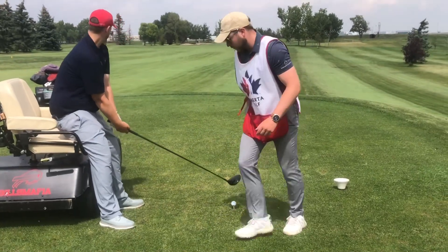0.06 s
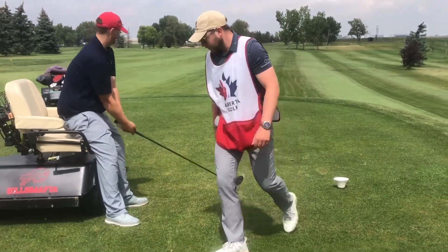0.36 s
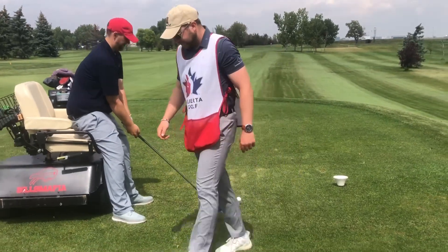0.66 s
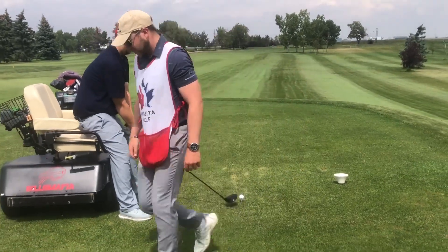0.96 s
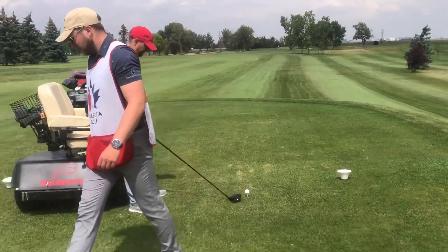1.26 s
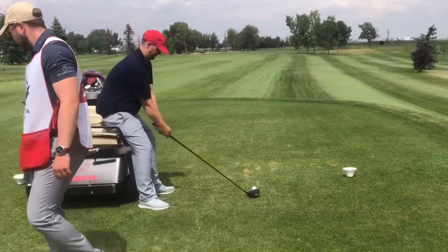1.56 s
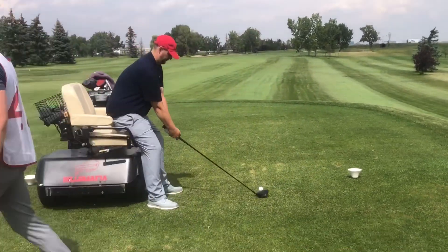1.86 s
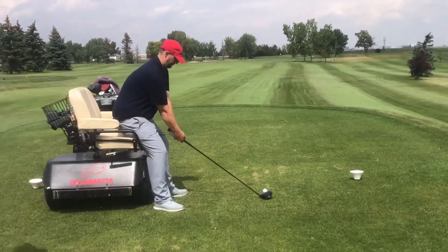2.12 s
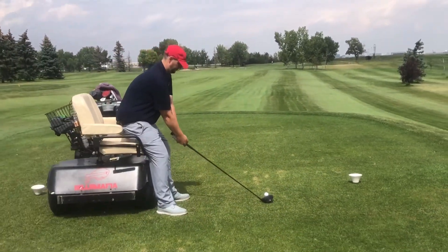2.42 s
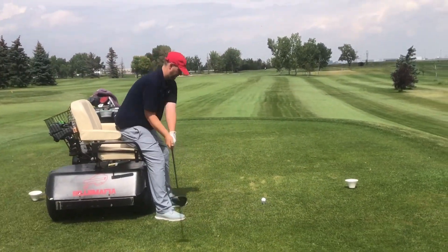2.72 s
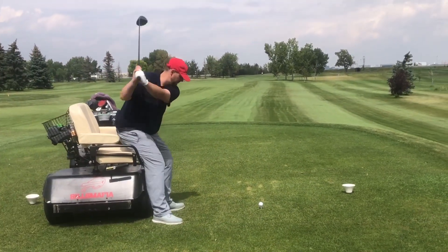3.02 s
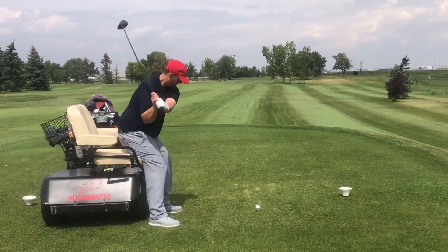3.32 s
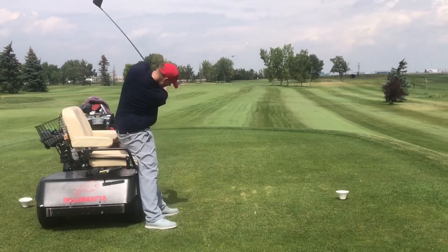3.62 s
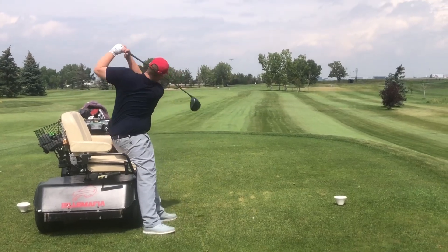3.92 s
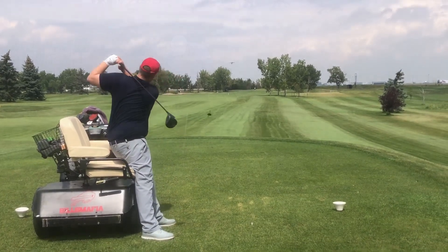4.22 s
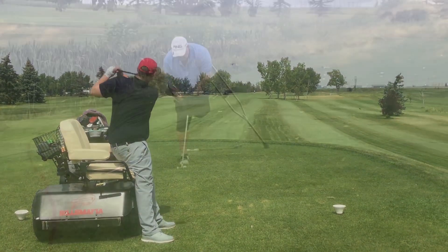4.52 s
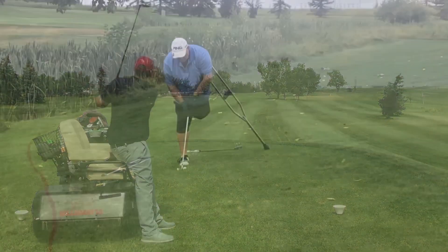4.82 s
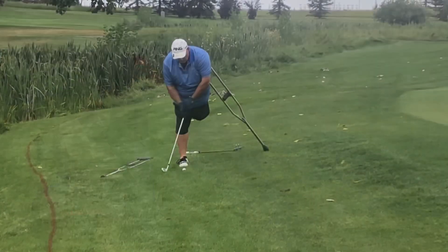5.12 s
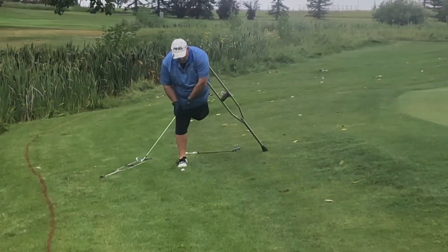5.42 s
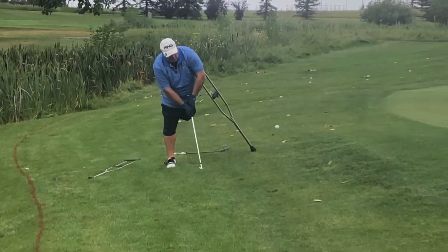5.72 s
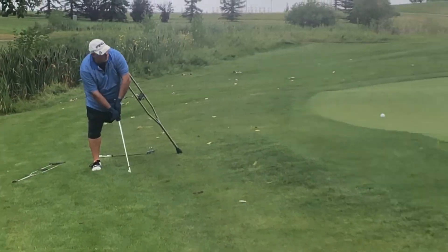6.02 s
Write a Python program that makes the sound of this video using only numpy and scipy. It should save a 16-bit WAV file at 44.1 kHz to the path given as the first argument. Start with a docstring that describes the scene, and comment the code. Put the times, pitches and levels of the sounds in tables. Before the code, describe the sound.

Quiet open air on a golf course, with light wind on the microphone and a faint, distant engine drone that slowly eases off. A soft low bump comes at 0.2 seconds, and a small bird gives a faint, high stutter and falling whistle just after. Between about 1.3 and 1.9 seconds, several dull thumps sound close to the microphone with low gusts and tiny clothing ticks. The bird repeats near 2.6 seconds. At 3.5 seconds a golf club swishes briefly and strikes the ball with a loud, sharp crack and a short metallic ring, the loudest event. The bird calls again around 3.7 and 4.1 seconds. From about 4.2 seconds a faint, steady buzz like a small electric motor sounds for a second, fading with the engine into quieter, breezy air. At about 5.6 seconds an iron clicks faintly against a ball.

```python
"""At a golf tee a far engine drones, a small bird repeats a stutter and a falling whistle, and soft
bumps come as a helper walks past. At 3.5 s a golfer drives from a seated cart: turbulent air swishes,
then the impact cracks and sets the modes of the hollow metal club head ringing. A steady buzz starts
and fades with the tee into a quieter, breezy green, where a faint whistle sounds and an iron clicks."""
import sys
import numpy as np
from scipy import signal
from scipy.fft import rfft, irfft, next_fast_len
from scipy.io import wavfile

SR = 44100
rng = np.random.default_rng(int(sys.argv[2]) if len(sys.argv) > 2 else 0)


def transcribe(signal):
    """Save signal, clipped to [-1, 1], as a 16-bit WAV file at the path in sys.argv[1]."""
    frames = np.atleast_2d(signal).T
    limited = np.clip(frames, -1, 1)
    pcm = np.round(limited * 32767).astype(np.int16)
    wavfile.write(sys.argv[1], SR, pcm)


N = 272097
T = np.arange(N) / SR


# hollow notes and low thud of the blow: (frequency [Hz], level [dB], t60 [s])
KNOCK_MODES = [(965, -28, .035), (540, -26, .04), (105, -45, 0.23)]
# heavily damped modes of the club face: (frequency [Hz], level [dB], t60 [s])
FACE_MODES = [(3253, -20.5, 0.015), (3990, -17.5, .014), (5200, -20.5, 0.0091), (7740, -14, 0.0085),
              (11100, -20.5, .012), (12890, -24, 0.027)]
# modes of the hollow head: (frequency [Hz], relative level [dB], t60 [s])
HEAD_MODES = [(3160, -21.5, .1), (3450, -27, .07), (3800, -22, .08), (4420, -28, .08), (5075, -17, .07),
              (5520, -18, 0.08), (5900, -21, 0.08), (6105, -16, .065), (6260, -12.5, .065),
              (6920, -7, 0.08), (7060, -16, .06), (7240, -4, 0.055), (7680, -0.5, .052), (8000, 1, 0.052),
              (8200, -3, .065), (8575, -8, .055), (8962, -9, .058), (9470, -6.5, .06), (9596, -8.5, .06),
              (9900, -13, 0.06), (10900, -17, .06), (11200, -9, .042), (11800, -12, 0.053),
              (11800, -11, .042), (13520, -13, .04), (13970, -14, .036), (14395, -15, .036)]
# burst of the impact: (frequency [Hz], relative density [dB])
CRACK_SPECTRUM = [(200, -28.5), (600, -15.5), (1600, -5), (2400, -9.5), (4500, -1.5), (7800, -3),
                  (11000, -2.5), (16000, -7.5)]
# wash of the head's many weak modes: (frequency [Hz], relative density [dB])
SHIMMER_SPECTRUM = [(300, -13.5), (1200, -5), (2400, -13.5), (3800, -7), (4700, -9), (6200, -4.5),
                    (7900, 0), (9800, -4), (10400, -9), (12500, -8), (16000, -12)]

def drive(impact_s=3.5177, high_hz=2100, low_hz=380, fall_s=.0011, release_s=.0006):
    """Impact excitation: the ball knocks, the face cracks, and the head rings once the ball has left."""
    t = T[:SR // 4]
    hz = low_hz + (high_hz - low_hz) * np.exp(-t / fall_s)
    knock = amp(-7.5 - 60 * t / .013) * np.sin(2 * np.pi * np.cumsum(hz) / SR) - ringing(KNOCK_MODES, t)
    crack = amp(-12.5 - 60 * t / .014) * noise(CRACK_SPECTRUM, len(t))
    shimmer = amp(-22 - 60 * t / .052) * noise(SHIMMER_SPECTRUM, len(t))
    contact = 1 - np.exp(-t / .00015)  # the ball flattens on the face
    out = np.zeros(N)
    add(out, impact_s, contact * (knock + crack + shimmer))
    add(out, impact_s + release_s, ringing(FACE_MODES, t) + amp(-23) * ringing(HEAD_MODES, t))
    return out


# reflections from cart and ground, then from far trees: (delay [s], spread [s], relative level [dB])
NEAR_ECHOES = [(.008, .006, -24), (.018, .009, -30), (.036, 0.0076, -30)]
FAR_ECHOES = [(.1, 0.021, -42), (.16, 0.063, -47.5)]
# frequency response of those two paths: (frequency [Hz], gain [dB])
NEAR_RESPONSE = [(200, -2.5), (1000, -4), (3200, 2.5), (6000, -2), (8000, -3.5), (11000, -3.5), (16000, -4)]
FAR_RESPONSE = [(200, 1), (1000, -16), (3000, 6.5), (5000, 1.5), (8000, -8.5), (11000, -8), (16000, -18)]

def with_reflections(shot):
    """Multipath propagation: near and far reflections follow the direct sound."""
    return shot + echoes(shot, NEAR_ECHOES, NEAR_RESPONSE) + echoes(shot, FAR_ECHOES, FAR_RESPONSE)


# airflow around shaft and head: (frequency [Hz], relative density [dB])
SWISH_SPECTRUM = [(150, -13), (350, -3), (560, 5.5), (900, -6.5), (2000, -17), (3500, -20), (8000, -26),
                  (15000, -33)]

def swish(peak_s=3.505, peak_db=-52.5, rise_db_per_s=196, fall_db_per_s=300):
    """Turbulence noise grows as the club speeds up and dies in the follow-through."""
    below_peak_db = np.maximum((peak_s - T) * rise_db_per_s, (T - peak_s) * fall_db_per_s)
    return noise(SWISH_SPECTRUM) * amp(peak_db - below_peak_db)


def chip(impact_s=5.626):
    """A light impact: an iron clicks on a ball, rings in one damped mode and brushes the grass."""
    click = tick(db=-56, hz=11000, t60=.018) + tick(db=-53, hz=4500, t60=.018)
    grass = tick(db=-67, hz=6500, t60=.14)
    ring = ringing([(3550, -63.5, .04)], T[:SR // 8])
    out = np.zeros(N)
    add(out, impact_s, click + grass + ring)
    return out


# thumps near the microphone: (time [s], level at the final pitch [dB], starting pitch [Hz], length [s])
BUMPS = [(0.196, -32.5, 106, 0.025), (1.356, -30, 604, 0.034), (1.427, -36, 230, .026),
         (1.448, -34, 522, 0.028), (1.743, -37, 323, 0.02), (1.776, -39, 278, 0.0164),
         (1.851, -30, 300, 0.018)]

def bumps(end_hz=73.5, sag_s=.00488, attack_s=.0015, db_per_octave=-2):
    """Downward chirps of a few cycles: each thump gains weight as it sinks toward the same low note."""
    out = np.zeros(N)
    for s, db, start_hz, length in BUMPS:
        t = np.arange(0, length, 1 / SR)
        hz = end_hz + (start_hz - end_hz) * np.exp(-t / sag_s)
        envelope = (1 - np.exp(-t / attack_s)) * (1 - (t / length) ** 4)
        level = amp(db + db_per_octave * np.log2(hz / end_hz))
        add(out, s, -level * envelope * np.sin(2 * np.pi * np.cumsum(hz) / SR))
    return out


# spectral envelope of the buzz: (harmonic number, relative level [dB])
BUZZ_HARMONICS = [(2, -10), (3, -2.5), (4, 0), (5, 0), (6, -1), (7, -1), (8, -7), (9, -4.5), (10, -5.5),
                  (11, -7.5), (12, -5), (13, -8), (14, -15.5), (15, -17.5), (17, -30), (19, -32), (21, -18),
                  (23, -20), (26, -32), (28, -40)]
# its decay, fastest in the low harmonics: (frequency [Hz], decay rate [dB/s])
BUZZ_DECAY = [(1000, 7.5), (2400, 5.5), (4500, 0.5)]
# its swells, strongest in the treble: (time [s], gain at harmonic 10 [dB], half-width [s])
BUZZ_SWELLS = [(4.29, 2.5, .04), (4.42, 3.5, 0.056), (4.59, 1.5, 0.033), (4.83, 3.5, 0.042)]

def buzz(on_s=4.178, off_s=5.15, pitch_hz=203.7, gain_db=-59, attack_s=.0097, release_s=.03):
    """A harmonic series, as of a small electric motor; each partial wavers in level on its own."""
    t = np.arange(0, off_s - on_s, 1 / SR)
    size = len(t)
    settling = 1 + .012 * np.exp(-t / .032)
    jitter = 1 + .0004 * drift(7.8, size) + .0048 * drift(106, size)
    turns = np.cumsum(pitch_hz * settling * jitter) / SR
    swells_db = sum(db * swell(s, width) for s, db, width in BUZZ_SWELLS)[round(on_s * SR):][:size]
    tone = np.zeros(size)
    for k in range(2, 29):
        phase = 2 * np.pi * (k * turns + .81 * rng.random())
        wander = 1 + .6 * np.tanh(1.5 * drift(13, size))
        sidebands = drift(45, size) * np.sin(phase) + drift(45, size) * np.cos(phase)
        decay_db = read(BUZZ_DECAY, k * pitch_hz) * t
        level = amp(follow(BUZZ_HARMONICS, k) - decay_db + swells_db * np.sqrt(k / 10))
        tone += level * (wander * np.sin(phase) + .06 * np.sqrt(k) * sidebands)
    gate = np.minimum(t / attack_s, 1) * np.minimum((t[-1] - t) / release_s, 1)
    out = np.zeros(N)
    add(out, on_s, amp(gain_db) * tone * gate)
    return out


# songs: (stutter time [s], level [dB], whistle time [s], level [dB], whistle length [s], pitch factor)
SONGS = [(0.301, -65, 0.35, -60, 0.13, 1), (2.613, -61, 2.664, -59, .12, 1),
         (3.635, -77, 3.703, -65, 0.083, 1), (4.101, -61, 4.153, -56.5, .122, 0.996)]
# reflections from grass and trees: (delay [s], spread [s], relative level [dB])
BIRD_ECHOES = [(.005, 0.012, -9)]

def bird():
    """A stutter, then a falling whistle, blurred a little by scattering from grass and trees."""
    out = np.zeros(N)
    for stutter_s, stutter_db, whistle_s, whistle_db, length, factor in SONGS:
        add(out, stutter_s, amp(stutter_db) * stutter(factor))
        add(out, whistle_s, amp(whistle_db) * whistle(length, factor))
    return out + echoes(out, BIRD_ECHOES, NEAR_RESPONSE)


def stutter(factor, length_s=.025, sweep_hz=(5400, 6100), pulse_hz=171, upper_ratio=1.45, upper_db=-12):
    """Fast amplitude and frequency modulation make a two-voiced upsweep rasp."""
    t = np.arange(0, length_s, 1 / SR)
    modulator = np.cos(2 * np.pi * pulse_hz * t)
    hz = factor * np.interp(t, [0, length_s], sweep_hz) * (1 + .07 * modulator)
    pulses = np.sin(np.pi * t / length_s) * (1 - .5 * modulator)
    lower = note(hz, waver=.03, flutter_db=-.5)
    upper = note(hz * upper_ratio, waver=.03, flutter_db=.5)
    return pulses * (lower + amp(upper_db) * upper)


def whistle(length, factor, from_hz=6330, to_hz=5130, bend=1.3, attack_s=.019, fade_db=-16):
    """A frequency glide: a thin note holds its top, bends down, levels out and fades."""
    t = np.arange(0, length, 1 / SR)
    progress = t / length
    fall = np.sin(np.pi / 2 * progress ** bend) ** 2
    hz = factor * (from_hz + (to_hz - from_hz) * fall)
    envelope = np.minimum(t / attack_s, 1) * amp(fade_db * progress ** 2.05)
    return envelope * note(hz, waver=.0065, flutter_db=2)


def note(hz, waver, flutter_db):
    """Random modulation leaves a bird's near-pure tone slightly unsteady in pitch and level."""
    size = len(hz)
    turns = np.cumsum(hz * (1 + waver * drift(150, size))) / SR
    envelope = amp(flutter_db * drift(120, size)) * signal.windows.tukey(size, .12)
    return envelope * np.sin(2 * np.pi * turns)


# speed of the engine: (time [s], cycle rate [Hz])
ENGINE_SPEED = [(0, 27.6), (.5, 30), (1.5, 28.8), (3, 25.3), (5.3, 24.2)]
# its orders: (multiple of the cycle rate, relative level [dB])
ENGINE_ORDERS = [(6, 2.5), (7, -13.5), (8, -0.5), (9, -5.5), (10, -9.5), (13, -13.5)]
# exhaust resonance: (frequency [Hz], gain [dB])
EXHAUST_RESPONSE = [(140, -17.5), (162, -8.5), (174, -1), (205, 1), (232, -4.5), (380, -5)]

def engine(gain_db=-54, fade_db_per_s=1.36):
    """Source and filter: as a far engine eases off, its orders slide through the exhaust resonance."""
    cycle_hz = follow(ENGINE_SPEED, T)
    turns = np.cumsum(cycle_hz) / SR
    drone = np.zeros(N)
    for k, db in ENGINE_ORDERS:
        level = amp(db + read(EXHAUST_RESPONSE, k * cycle_hz) + 1.5 * drift(3.1))
        drone += level * np.sin(2 * np.pi * (k * turns + rng.random()))
    return amp(gain_db - fade_db_per_s * T) * drone


# ticks, squeaks and scuffs: (time [s], relative level [dB], centre [Hz], width [octaves], t60 [s])
TICKS = [(.192, -58.5, 5500, 0.49, 0.018), (0.23, -56.5, 2580, 0.59, .025),
         (1.064, -56.5, 9150, 0.13, 0.034), (1.168, -59, 5000, 0.64, .015), (1.304, -45, 540, 0.45, 0.06),
         (1.389, -62, 6000, 1.3, 0.014), (1.868, -62.5, 9000, .3, 0.032), (2.189, -56, 3160, 0.64, .03),
         (2.232, -62.5, 9950, .8, 0.036), (3.371, -60.5, 6002, 0.81, 0.023), (3.427, -43.5, 540, 0.5, 0.04),
         (3.494, -50, 7500, .8, 0.023)]

def ticks(lead_s=.014):
    """Contact transients: gear and clothing tick, each time with a soft scrape around the tick."""
    out = np.zeros(N)
    for s, db, hz, octaves, t60 in TICKS:
        scrape = noise(band(hz, octaves), SR // 25) * np.hanning(SR // 25)
        add(out, s, tick(db, hz, t60, octaves))
        add(out, s - lead_s, amp(db - 21) * scrape)
    return out


def tick(db, hz, t60, octaves=1):
    """Exponential decay of a noise band gives a dry burst around one pitch."""
    t = T[:SR // 8]
    return amp(db - 8.5 - 60 * t / t60) * noise(band(hz, octaves), len(t))


# brushes of clothing and of shoes on grass: (time [s], level [dB])
BRUSHES = [(.57, -82), (.87, -85), (1.07, -87), (1.26, -81), (1.42, -82), (1.9, -89), (2.6, -82),
           (3.76, -86)]
# their hiss: (frequency [Hz], relative density [dB])
RUSTLE_SPECTRUM = [(400, -10), (2500, 0.5), (6000, -1), (10000, -3.5), (15500, -6)]

def rustle(floor_db=-90, half_width_s=.07):
    """Friction noise: cloth and grass hiss in small clumps, louder with each brush."""
    level = amp(floor_db) + sum(amp(db) * swell(s, half_width_s) for s, db in BRUSHES)
    return level * unit(noise(RUSTLE_SPECTRUM) * amp(3.5 * drift(120)))


def far_bird(start_s=5.28, length_s=.34, start_hz=4170, rise_hz_per_s=226, db=-86):
    """A slow linear chirp: a faint held whistle swells and creeps up in pitch."""
    out, t = np.zeros(N), np.arange(0, length_s, 1 / SR)
    envelope = amp(db) * np.sin(np.pi * t / length_s)
    add(out, start_s, envelope * note(start_hz + rise_hz_per_s * t, waver=.012, flutter_db=3))
    return out


# gusts: (time [s], level [dB], half-width [s])
GUSTS = [(.21, -48.5, 0.11), (.45, -52, 0.044), (1.43, -43.5, 0.1), (1.61, -49.5, 0.053),
         (1.83, -46.5, 0.12), (2.56, -55.5, 0.12), (3.21, -49.5, .06), (3.53, -45, .09), (4.25, -57.5, .35),
         (5.8, -56, .08), (6.14, -53, .05)]
# wind on the microphone: (frequency [Hz], relative density [dB])
WIND_SPECTRUM = [(20, -28), (40, -9.5), (58, 0), (95, -3), (150, -9), (300, -23.5), (900, -49.5),
                 (4000, -81)]

def wind(steady_db=-62):
    """Incoherent addition: light wind and its gusts on the microphone sum in power."""
    power = amp(steady_db) ** 2 + sum((amp(db) * swell(s, width)) ** 2 for s, db, width in GUSTS)
    return np.sqrt(power) * noise(WIND_SPECTRUM)


# open air at the tee and at the green: (frequency [Hz], relative density [dB])
TEE_SPECTRUM = [(12, -52), (20, -21.5), (30, -9.5), (44, -7.5), (88, -0.5), (172, -6.5), (204, -5.5),
                (270, -16), (558, -18), (698, -21.5), (949, -20.5), (1190, -24.5), (1810, -32),
                (1960, -33.5), (16000, -56)]
GREEN_SPECTRUM = [(12, -59.5), (20, -29), (43, -8.5), (104, -1.5), (130, -7), (187, -13.5), (228, -10.5),
                  (542, -14.5), (759, -11.5), (1260, -21), (2020, -34), (4060, -37.5), (4420, -39.5),
                  (14700, -51), (16000, -53)]

def air(spectrum, db, swell_db):
    """Broadband ambient noise whose leafy treble swells and sinks by slow amplitude modulation."""
    wash = noise(spectrum)
    treble = signal.sosfilt(signal.butter(1, 3000, "high", fs=SR, output="sos"), wash)
    return amp(db) * (wash + treble * (amp(swell_db * drift(6)) - 1))


def echoes(x, clusters, spectrum):
    """Convolution with clusters of scattered reflections, each building up and dying away."""
    response = np.zeros(SR)
    for delay, spread, db in clusters:
        age = T[:SR] / spread
        cluster = rng.standard_normal(SR) * np.sqrt(age) * np.exp(-age)
        add(response, delay, amp(db) * cluster / np.linalg.norm(cluster))
    return signal.fftconvolve(x, colour(response, spectrum))[:N]


def ringing(modes, t):
    """Modal superposition: damped sines struck together."""
    return sum(amp(db - 60 * t / t60) * np.sin(2 * np.pi * hz * t) for hz, db, t60 in modes)


def noise(spectrum, size=N):
    """Spectrally shaped Gaussian noise of rms 1."""
    return unit(colour(rng.standard_normal(size), spectrum))


def drift(hz, size=N):
    """Low-pass noise of bandwidth hz and rms near 1."""
    n = 2 * SR if size < 2 * SR else next_fast_len(N)
    f = np.fft.rfftfreq(n, 1 / SR)
    return unit(irfft(rfft(rng.standard_normal(n)) * np.exp(-(f / hz) ** 2), n))[:size]


def colour(x, spectrum):
    """Zero-phase filtering by a spectrum."""
    return irfft(rfft(x) * amp(read(spectrum, np.fft.rfftfreq(len(x), 1 / SR))), len(x))


def band(hz, octaves):
    """A band-pass spectrum, 6 dB down at the given distance either side of hz."""
    return [(hz * 2 ** (k * octaves), -6 * k * k) for k in range(-3, 4)]


def swell(s, width):
    """A Gaussian envelope around time s."""
    return np.exp(-((T - s) / width) ** 2)


def read(points, hz):
    """Interpolation on a log-frequency axis."""
    f, value = np.transpose(points)
    return np.interp(np.log(hz + 1), np.log(f + 1), value)


def follow(points, x):
    """Linear interpolation along a curve."""
    return np.interp(x, *np.transpose(points))


def add(mix, s, sound):
    """Superposes a sound at time s."""
    part = mix[round(s * SR):][:len(sound)]
    part += sound[:len(part)]


def amp(db):
    """Decibels to amplitude ratio."""
    return 10 ** (np.asarray(db) / 20)


def unit(x):
    """Normalises to an rms of 1."""
    return x / np.sqrt(np.mean(x ** 2) + 1e-20)


def scene(fade_s=(4.07, 5.415)):
    """Superposition: the tee crossfades linearly into the green while the wind blows throughout."""
    tee = with_reflections(drive()) + swish() + ticks() + bumps() + rustle() + bird() + engine() + buzz()
    tee += air(TEE_SPECTRUM, db=-54.5, swell_db=.4)
    green = air(GREEN_SPECTRUM, db=-58.5, swell_db=.5) + chip() + far_bird()
    tee_share = np.interp(T, fade_s, [1, 0])
    return (tee_share * tee + (1 - tee_share) * green + wind())[None]


def record(dry, low_cut_hz=33, high_cut_hz=15800):
    """Band limiting: the microphone's low cut, then a steep low-pass filter."""
    thinned = signal.sosfilt(signal.butter(3, low_cut_hz, "high", fs=SR, output="sos"), dry)
    low_pass = signal.firwin(511, high_cut_hz, window=("kaiser", 9), fs=SR)
    return signal.oaconvolve(thinned, low_pass[None], "same")


dry = scene()
out = record(dry)
transcribe(out)
```